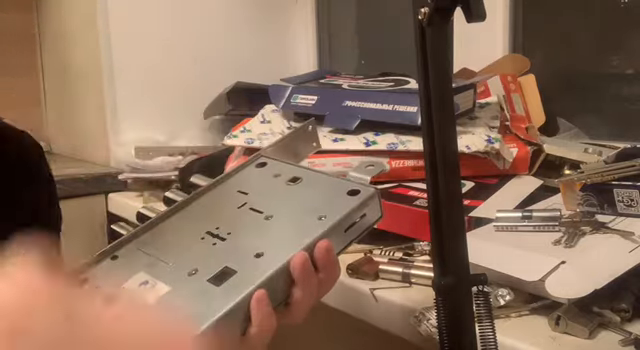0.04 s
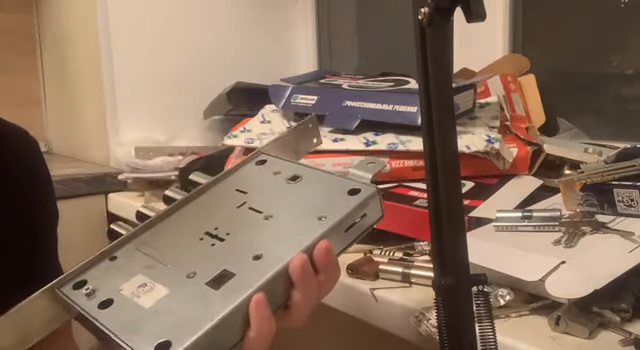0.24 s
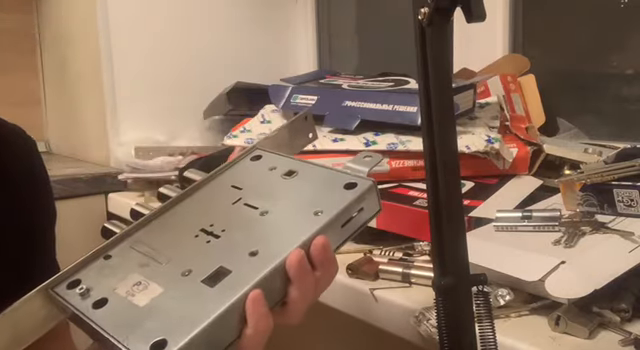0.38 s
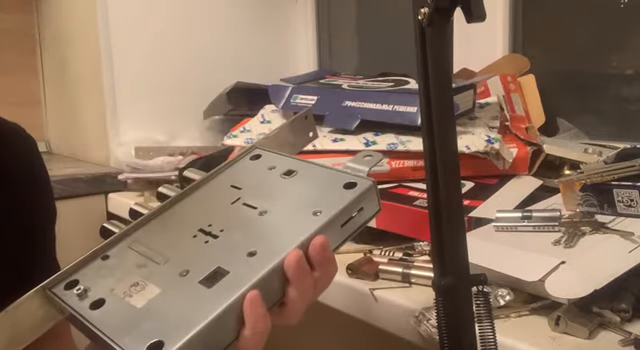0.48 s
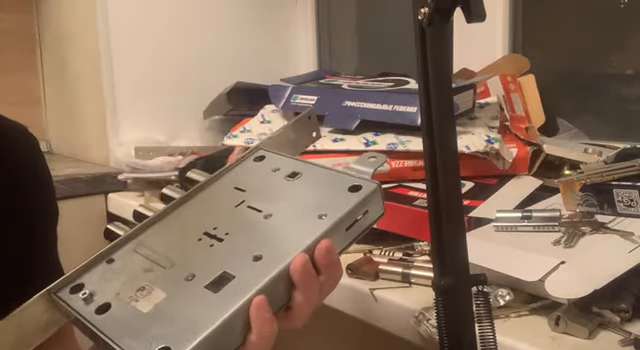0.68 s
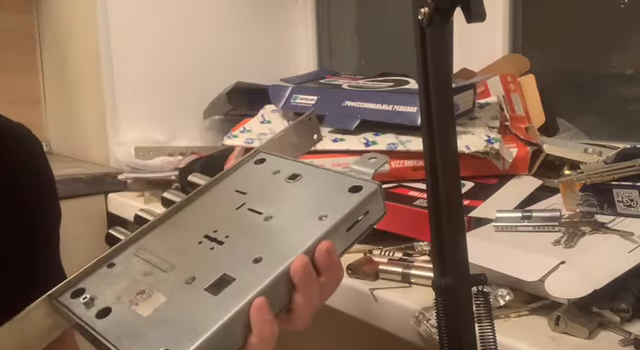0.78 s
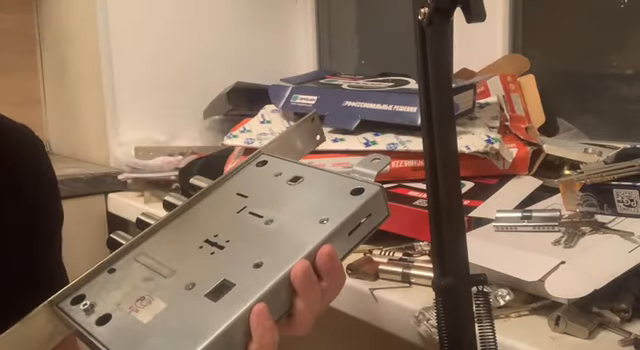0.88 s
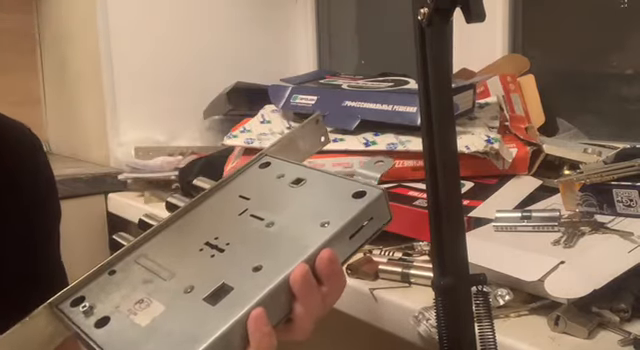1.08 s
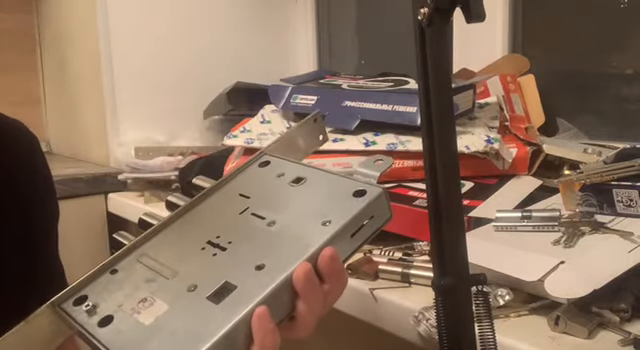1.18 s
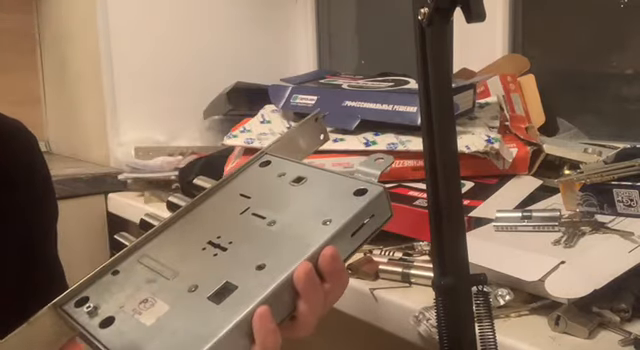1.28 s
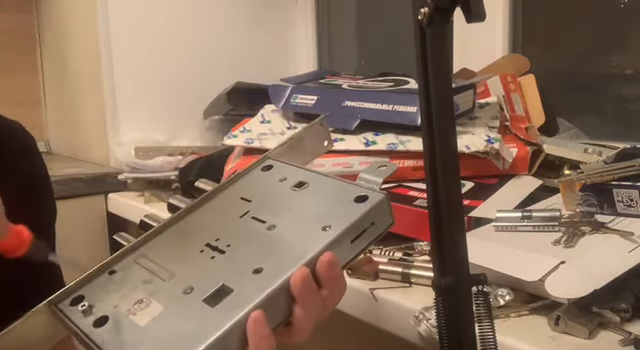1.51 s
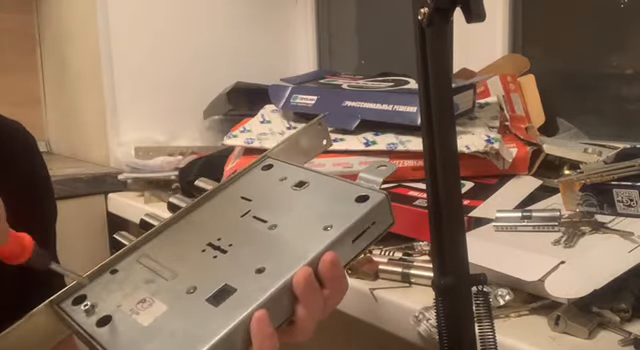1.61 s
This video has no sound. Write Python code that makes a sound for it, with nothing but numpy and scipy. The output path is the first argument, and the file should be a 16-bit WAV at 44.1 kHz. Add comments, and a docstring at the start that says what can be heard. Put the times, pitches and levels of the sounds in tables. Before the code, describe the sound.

Two ringing metal clacks and a dull clunk from a lock worked by hand.

```python
"""A steel lock case is held in the hand and worked in a small workshop.
Steel parts strike the case in two ringing clacks, levers and a spring tick and scrape,
and then the heavy bolt goes home with one dull clunk. The case thumps softly in the shifting hand.
Afterwards something loose rocks to rest with four faint knocks over the quiet air of the room."""
import sys
import numpy as np
from scipy import signal
from scipy.fft import rfft, irfft
from scipy.io import wavfile
from scipy.ndimage import map_coordinates

SR = 44100
rng = np.random.default_rng(int(sys.argv[2]) if len(sys.argv) > 2 else 0)


def transcribe(signal):
    """Save signal, clipped to [-1, 1], as a 16-bit WAV file at the path in sys.argv[1]."""
    frames = np.atleast_2d(signal).T
    limited = np.clip(frames, -1, 1)
    pcm = np.round(limited * 32767).astype(np.int16)
    wavfile.write(sys.argv[1], SR, pcm)


N = 72765
LOWEST_HZ, TOP_HZ = 30, 12100
BANDS = np.geomspace(340, 12300, 40) - 300  # centres of the noise bands [Hz]
BLOW_S = .01  # one blow has the energy of this much full-level noise

# How alike the two ears hear a blow: (frequency [Hz], likeness [1 = the same])
BLOW_ALIKE = [(300, 1), (1200, .92), (2200, 0.067), (10000, 0.11)]
# How alike they hear ringing, rubbing and the room: (frequency [Hz], likeness [1 = the same])
RING_ALIKE = [(280, 0.98), (550, 0.38), (1100, -0.11), (2500, -0.045), (8000, 0.17)]


def amp(db):
    """Turn decibels into a number to multiply by."""
    return 10 ** (np.asarray(db) / 20)


def along(points, hz):
    """Read a curve of (frequency, value) points, with the octaves evenly spaced."""
    freqs, values = np.transpose(points)
    return np.interp(np.log(hz + 1), np.log(freqs + 1), values)


def spread(alike, hz):
    """Turn left-right likeness into an angle: 0 means both ears hear the same."""
    return np.arccos(np.clip(along(alike, hz), -1, 1)) / 2


def add(out, start_s, sound, pan_db=0):
    """Mix a sound in at its time; pan_db is how much louder it is on the left."""
    i = max(round(start_s * SR), 0)
    out[:, i:i + sound.shape[-1]] += sound[..., :N - i] * amp(np.array([[pan_db], [-pan_db]]) / 2)


def noise_bands():
    """Two noises split into bands, made uneven by the crowded resonances of case and room."""
    size, ripple_db, ripple_step_hz = 65536, 3.6, 38
    hz = np.fft.rfftfreq(size, 1 / SR)
    shapes = np.sqrt([np.interp(hz, BANDS, row) for row in np.eye(len(BANDS))])
    shapes *= (hz > LOWEST_HZ) & (hz < TOP_HZ)
    bumps = map_coordinates(rng.standard_normal(SR // ripple_step_hz), [hz / ripple_step_hz])
    ripple = amp(ripple_db * bumps * np.minimum(hz / 1500, 1))  # smoother in the bass
    white = rfft(rng.standard_normal((2, 1, size)))
    return irfft((white * shapes * ripple).astype(np.complex64))


def burst(bank, envelope, colour, alike, focus_hz=None):
    """Stereo noise with the energy of one blow; it can favour the bands around one pitch."""
    focus_db, focus_octaves = 8, 0.67
    start = rng.integers(bank.shape[-1] - SR)
    bands = bank[..., start:start + envelope.shape[-1]] * envelope.astype(np.float32)
    db = along(colour, BANDS)
    if focus_hz:
        db = db + focus_db * np.exp(-(np.log2(BANDS / focus_hz) / focus_octaves) ** 2)
    gain = amp(db) * np.sqrt(np.gradient(BANDS))  # wider bands carry more energy
    angle = spread(alike, BANDS)
    energy = np.sum(bands ** 2, axis=-1) + 1e-20
    weight = gain / np.linalg.norm(gain) * np.array([np.cos(angle), np.sin(angle)]) / np.sqrt(energy)
    mid, side = np.einsum('cb,cbt->ct', weight.astype(np.float32), bands) * np.sqrt(BLOW_S * SR)
    return np.array([mid + side, mid - side])


def dying(fades, attack_s):
    """Each band rises quickly and dies away. A fade time is how long it takes to drop 60 dB."""
    fade_s = np.clip(along(fades, BANDS), .003, 1)[:, None]
    t = np.arange(int(fade_s.max() * SR)) / SR
    return amp(-60 * np.minimum(t / fade_s, 2)) * (1 - np.exp(-t / attack_s))


def ringing(tones, attack_s, scatter_db=0):
    """The fading tones of a struck object; the high ones reach the two ears out of step."""
    t = np.arange(SR // 2) / SR
    out = np.zeros((2, len(t)))
    for hz, db, fade_s in tones:
        apart = spread(RING_ALIKE, hz) * rng.choice([-1, 1])
        envelope = amp(db + scatter_db * rng.normal() - 60 * t / fade_s)
        out += envelope * np.sin(2 * np.pi * hz * t + np.array([[apart], [-apart]]))
    return out * (1 - np.exp(-t / attack_s))


def knock(hz, swell_s):
    """A few clean cycles swell and die at the pitch of a contact; the harder it is, the quicker."""
    peak_db = 4
    t = np.arange(SR // 16) / SR
    age = t / swell_s
    return amp(peak_db) * age ** 2 * np.exp(2 * (1 - age)) * np.sin(2 * np.pi * hz * t)


def rub(bank, length_s, colour, hz):
    """One stroke of rubbing, roughened by many tiny slips."""
    slip_db, slips_per_s = 1.5, 260
    t = np.arange(int(length_s * SR)) / SR
    slips = map_coordinates(rng.standard_normal(SR // 100), [t * slips_per_s], mode='wrap')
    stroke = np.sqrt(np.abs(np.sin(np.pi * t / length_s))) * amp(slip_db * slips)
    return np.sqrt(length_s / BLOW_S) * burst(bank, stroke, colour, RING_ALIKE, hz)


def room_air():
    """The quiet air of the room: a steady, low hush."""
    # Tone colour of the air: (frequency [Hz], level [dB])
    air_colour = [(25, -6.5), (60, -1.5), (130, 2), (260, -1.5), (400, -14.5), (800, -12.5), (1200, -19.5),
                  (2000, -24), (5000, -30), (12000, -31.5)]
    level_db = -70.5
    hz = np.fft.rfftfreq(N, 1 / SR)
    angle = spread(RING_ALIKE, hz)
    hush = rfft(rng.standard_normal((2, N))) * amp(along(air_colour, hz))
    mid, side = irfft(hush * [np.cos(angle), np.sin(angle)], N)
    pair = np.array([mid + side, mid - side])
    return amp(level_db) * pair / pair.std()


def hand_grip(bank):
    """The hand shifts on the case with a soft rumble."""
    # Moves of the hand: (start [s], length [s], level [dB], pitch [Hz])
    hand_moves = [(0.039, 0.13, -71, 250), (0.266, 0.18, -52, 135), (0.47, 0.092, -55.5, 132.8),
                  (0.618, 0.085, -59.5, 110), (0.906, .07, -57, 126), (1.07, 0.13, -57, 137),
                  (1.219, 0.113, -68.5, 267)]
    # Tone colour of skin on steel: (frequency [Hz], level [dB])
    grip_colour = [(40, -2.5), (130, -1), (280, -3.5), (600, -16), (1500, -18.5), (5000, -44.5),
                   (12000, -44)]
    out = np.zeros((2, N))
    for s, length_s, db, hz in hand_moves:
        add(out, s, amp(db) * rub(bank, length_s, grip_colour, hz))
    return out


def rocking():
    """Something loose rocks to rest, ringing briefly at each touch."""
    # Its four touches: (time [s], level [dB])
    touches = [(1.2258, -46.5), (1.3597, -53.5), (1.4881, -53.5), (1.618, -59.5)]
    # Its own tones: (pitch [Hz], level [dB], fade time [s])
    loose_tones = [(432, 6.5, 0.053), (628, 2.5, 0.027), (820, -1, 0.033)]
    out = np.zeros((2, N))
    for s, db in touches:
        add(out, s, amp(db) * ringing(loose_tones, attack_s=0.0037))
    return out


def sliding_parts(bank):
    """Steel rubs on steel in uneven slips, and the scrape swells just before the big blows."""
    # Sliding strokes: (start [s], length [s], level [dB], pitch [Hz], left over right [dB])
    strokes = [(0.242, 0.15, -39, 477, -1.5), (0.60, 0.12, -50.5, 436, 3.5), (0.716, 0.069, -51, 1700, 3),
               (0.76, 0.13, -56, 1370, 3), (0.907, 0.09, -51, 680, 1.5)]
    # Tone colour of the scrape: (frequency [Hz], level [dB])
    scrape_colour = [(60, -16), (200, 7.5), (850, 4.5), (2200, -0.5), (2800, -11), (4800, -16), (5800, -31),
                     (8000, -36), (12000, -38.5)]
    # Parts gathering speed before they strike: (time of the strike [s], level [dB])
    run_ups = [(0.202, -36.5), (0.389, -28.5), (0.9888, -45.5)]
    out = np.zeros((2, N))
    for s, length_s, db, hz, pan_db in strokes:
        add(out, s, amp(db) * rub(bank, length_s, scrape_colour, hz), pan_db)
    squeal = ringing([(846, 0, 0.12)], attack_s=0.009)  # a sliding part sings briefly
    add(out, .728, amp(-37) * squeal, pan_db=11)
    rise_db_per_s, fall_db_per_s = 1503, 4999
    t = np.arange(-SR // 32, SR // 64) / SR
    swell = amp(np.minimum(rise_db_per_s * t, -fall_db_per_s * t))
    for s, db in run_ups:
        add(out, s + t[0], amp(db) * burst(bank, swell, scrape_colour, BLOW_ALIKE))
    return out


def lever_ticks(bank):
    """The levers and spring snap with a clean ping and leave a bright shimmer."""
    # Their snaps: (time [s], level [dB], pitch [Hz], ring compared with the snap [dB])
    snaps = [(0.1995, -53, 4300, -16), (0.2455, -45, 10700, -1.5), (0.3040, -43.5, 8500, -4),
             (0.3517, -50.5, 7100, 1), (0.353, -51.5, 11900, -9), (0.3955, -43.5, 11000, 0.5),
             (0.4192, -40.5, 6890, -10.5), (0.421, -42.5, 11770, -13), (0.474, -56, 7000, -28),
             (0.5013, -42.5, 7430, -6), (0.5085, -48.5, 6900, -6), (0.5976, -63, 8400, 1.5),
             (0.64, -69, 7500, 7)]
    # Tone colour of a snap: (frequency [Hz], level [dB])
    tick_colour = [(1000, -17), (3000, -8), (4800, 2), (5600, -10.5), (7000, 5.5), (8400, -0.5),
                   (9400, -30), (10600, 6.5), (12000, -2.5)]
    # Tones of the levers and spring: (pitch [Hz], level [dB], fade time [s])
    lever_tones = [(3990, -2, 0.4), (4400, -4, 0.28), (5020, -6, .3), (5970, -0.5, 0.3), (6890, 5.5, 0.33),
                   (7150, 2, 0.35), (7600, -3, 0.2), (8600, -8, .2), (10800, -1, 0.33), (11850, 2, 0.22)]
    ping_db, tones_db = 1.5, -14
    snap_fade_s, ring_fade_s = .011, 0.24
    snap = dying([(1, snap_fade_s)], attack_s=.0007)  # one point: all bands fade alike
    tail = dying([(1, ring_fade_s)], attack_s=0.0028)
    out = np.zeros((2, N))
    for s, db, hz, ring_db in snaps:
        add(out, s, amp(db + ping_db) * knock(hz, swell_s=.0008))
        add(out, s, amp(db) * burst(bank, snap, tick_colour, BLOW_ALIKE, hz))
        add(out, s, amp(db + ring_db) * burst(bank, tail, tick_colour, RING_ALIKE, hz))
        add(out, s, amp(db + ring_db + tones_db) * ringing(lever_tones, attack_s=.001, scatter_db=5))
    return out


def case_thumps():
    """The whole case gives in the hand with low thumps."""
    # Recoils of the case: (time [s], level [dB], pitch [Hz], fade time [s])
    recoils = [(0.109, -45, 253.4, 0.056), (0.207, -27.5, 125.9, 0.32), (0.398, -13.5, 122, 0.052),
               (0.3975, -18, 200, 0.044), (0.406, -23.5, 68, 0.08), (0.891, -34, 135, .09),
               (1.012, -36, 61, 0.18)]
    out = np.zeros((2, N))
    for s, db, hz, fade_s in recoils:
        add(out, s, amp(db) * ringing([(hz, 0, fade_s)], attack_s=0.0036))
    return out


def bolt_clunk(bank):
    """The heavy bolt lands with two small cracks, chatters and rings low."""
    # Landing and bounces: (time [s], level [dB], pitch [Hz], swell [s], added level of the crunch [dB])
    bounces = [(0.9866, -27, 1106, 0.0045, -1.5), (0.9868, -29.5, 1960, .0012, -3.5),
               (0.9875, -16.5, 485, 0.0018, -14), (0.9915, -13.5, 506, 0.0011, -12.5),
               (0.9965, -25.5, 316, 0.0021, -5), (1.0005, -21.5, 424, 0.00099, -8),
               (1.0095, -22.5, 439, 0.0014, -6.5), (1.016, -21.5, 657, 0.0021, -22),
               (1.018, -24, 219, 0.0074, -13.5), (1.028, -34.5, 540, 0.0025, -2.5),
               (1.037, -34, 179, 0.0037, -11)]
    # Tone colour of the clunk: (frequency [Hz], level [dB])
    clunk_colour = [(40, -23), (120, 8), (220, 0), (450, 3.5), (750, -1.5), (1200, -11.5), (1800, -14),
                    (2500, -16), (3700, -20), (5500, -35), (7500, -29.5), (9500, -42), (11500, -31.5)]
    # How fast the crunch dies: (frequency [Hz], fade time [s])
    crunch_fades = [(200, 0.066), (1000, 0.051), (5000, 0.021)]
    # How fast the ring after it dies: (frequency [Hz], fade time [s])
    ring_fades = [(150, 0.32), (700, 0.32), (3000, 0.42), (10000, 0.246)]
    # Tones of the bolt: (pitch [Hz], level [dB], fade time [s])
    bolt_tones = [(141.4, -9.5, 0.28), (221.7, 1.5, 0.15), (435, 3, 0.1), (562, -11.5, 0.32),
                  (632, -10, 0.25), (770, -9, 0.077), (1455, -16, 0.16), (1686, -18, 0.22),
                  (2756, -34.5, .31)]
    # The bolt's first hard touches: (time [s], level [dB])
    first_touches = [(0.9858, -38), (0.9911, -45.5)]
    # Tone colour of their crack: (frequency [Hz], level [dB])
    crack_colour = [(300, -24), (2000, -7.5), (3700, 5.5), (4900, -9.5), (5800, -18.5), (7500, -14),
                    (9500, -29), (11500, -11.5)]
    ring_db, tones_db, tones_start_s, crack_fade_s = -24, -19.5, 0.9875, 0.026
    crunch, tail = dying(crunch_fades, attack_s=0.0028), dying(ring_fades, attack_s=0.0048)
    crack = dying([(1, crack_fade_s)], attack_s=0.00017)
    out = np.zeros((2, N))
    for s, db, hz, swell_s, crunch_db in bounces:
        add(out, s, amp(db) * knock(hz, swell_s))
        add(out, s, amp(db + crunch_db) * burst(bank, crunch, clunk_colour, BLOW_ALIKE, hz))
        add(out, s, amp(db + ring_db) * burst(bank, tail, clunk_colour, RING_ALIKE))
    add(out, tones_start_s, amp(tones_db) * ringing(bolt_tones, attack_s=0.0087))
    for s, db in first_touches:
        add(out, s, amp(db) * burst(bank, crack, crack_colour, BLOW_ALIKE), pan_db=2)
    return out


def case_clacks(bank):
    """Steel parts hit the case: each is a knock with a short crunch, then the steel case and parts ring on."""
    # The hits: (time [s], level [dB], pitch [Hz], swell [s], added level of the crunch [dB],
    # added level of the ring [dB], treble boost of the ring [dB], left over right [dB])
    case_hits = [(0.198, -23, 851, 0.0038, -3, -6.5, -7.5, -3.5),
                 (0.2030, -17.5, 442, 0.0012, -12, -12.5, -8.5, 3),
                 (0.2028, -32, 1410, 0.0013, -7.5, -14.5, -8, 3), (0.2156, -31, 607, 0.0052, -1, -9, -5, 4),
                 (0.2205, -28.5, 800, 0.0013, -6.5, -10.5, -4, -4),
                 (0.2275, -31.5, 1250, 0.0015, -2, -13, -6.5, -6),
                 (0.2294, -35, 358, 0.0083, -9.5, -9.5, -4, -6),
                 (0.241, -30, 1210, .002, -9.5, -12, -5, 7.5),
                 (0.309, -41.5, 600, 0.0035, -16, -1.5, -1, -2),
                 (0.351, -36, 720, 0.0018, -7.5, -2.5, -1, -4),
                 (0.3835, -27.5, 1340, .005, -5.5, -6.5, 3, -1.5),
                 (0.3874, -29, 320, 0.0022, -1, -9, -1, 1),
                 (0.392, -11.5, 1205, 0.0016, -16.5, -11.5, 1.5, -7.5),
                 (0.3945, -15.5, 420, 0.0027, -10.5, -9, 4, 0.5),
                 (0.3905, -22, 792, 0.0013, -6.5, -15, 0, -3), (0.401, -31.5, 2880, .0015, -1.5, -1, 4, -3),
                 (0.420, -35, 740, .003, -3.5, -12, 1, -0.5),
                 (0.453, -36.5, 520, 0.003, -32, -15.5, -2, -4),
                 (0.471, -34.5, 1455, 0.0022, -1.5, -18.5, 0.5, -0.5),
                 (0.4914, -30, 720, 0.0017, -11, -4, 4, -3), (0.4925, -36, 1900, 0.0022, 0, -2.5, -1, 2),
                 (0.498, -30.5, 400, 0.0022, -3.5, -21.5, -4, -1.5),
                 (0.516, -36.5, 565, 0.0017, 0.5, -3.5, -11, 0),
                 (0.879, -43.5, 740, 0.0018, -10.5, -8.5, -2, 8.5)]
    # Tone colour of the crunch: (frequency [Hz], level [dB])
    crunch_colour = [(40, -25), (120, -5.5), (400, 5), (800, 0.5), (1300, 0), (2000, -4.5), (3000, -15.5),
                     (4300, -23), (5600, -25.5), (7500, -30.5), (9400, -44.5), (12000, -36)]
    # How fast the crunch dies: (frequency [Hz], fade time [s])
    crunch_fades = [(100, .05), (1000, 0.036), (8000, 0.038)]
    # Tone colour of the dense ring: (frequency [Hz], level [dB])
    ring_colour = [(40, -23.5), (130, 4), (400, 0), (800, -0.5), (1400, -7.5), (2000, -9.5), (2900, -8.5),
                   (3600, -20), (4600, -19), (5600, -40), (7200, -22.5), (9400, -50), (11500, -38)]
    # How fast the ring dies: (frequency [Hz], fade time [s])
    ring_fades = [(60, 0.089), (200, 0.36), (700, 0.51), (2500, .55), (5000, .55), (11000, 0.15)]
    # Where the treble boost acts: (frequency [Hz], share of the boost [0 to 1])
    treble_share = [(1000, 0), (3500, 1)]
    # Tones of the case: (pitch [Hz], level [dB], fade time [s])
    case_tones = [(324.4, -8, 0.34), (388, -4, .25), (610, -0.5, .4), (683.5, -0.5, .35), (852, -1, 0.39),
                  (1043.4, 4.5, 0.32), (1245, 1.5, 0.1725), (1320, 1, 0.33), (1820, -11.5, .3),
                  (1898, -7.5, 0.22), (2197, -7.5, .36), (2348, -20.5, 0.32), (2601, -16, .35),
                  (3030, -14, 0.17)]
    tones_db = -11
    crunch, tail = dying(crunch_fades, attack_s=.001), dying(ring_fades, attack_s=0.00053)
    out = np.zeros((2, N))
    for s, db, hz, swell_s, crunch_db, ring_db, treble_db, pan_db in case_hits:
        colour = [(f, level + treble_db * along(treble_share, f)) for f, level in ring_colour]
        add(out, s, amp(db) * knock(hz, swell_s), pan_db)
        add(out, s, amp(db + crunch_db) * burst(bank, crunch, crunch_colour, BLOW_ALIKE, hz), pan_db)
        add(out, s, amp(db + ring_db) * burst(bank, tail, colour, RING_ALIKE))
        add(out, s, amp(db + ring_db + tones_db) * ringing(case_tones, attack_s=.002, scatter_db=5.5))
    return out


def scene():
    """The lock, the hand that holds it and the room, added together."""
    bank = noise_bands()
    lock = case_clacks(bank) + lever_ticks(bank) + bolt_clunk(bank) + case_thumps() + sliding_parts(bank)
    return lock + hand_grip(bank) + rocking() + room_air()


def record(dry):
    """A steep filter cuts off the treble above TOP_HZ."""
    return signal.sosfilt(signal.cheby1(14, .1, TOP_HZ, fs=SR, output='sos'), dry)


dry = scene()
out = record(dry)
transcribe(out)
```